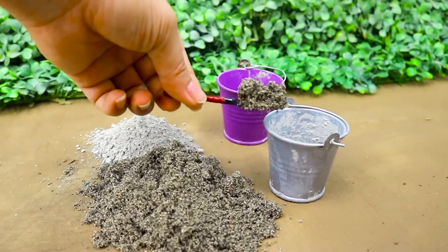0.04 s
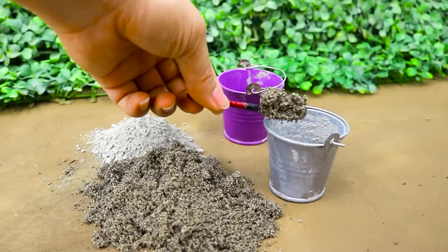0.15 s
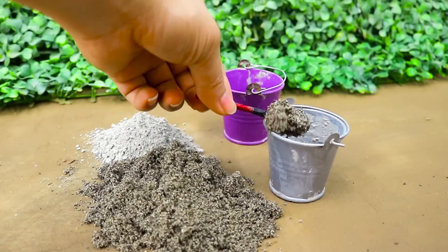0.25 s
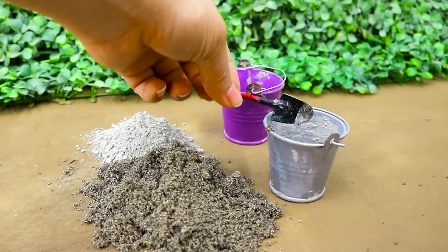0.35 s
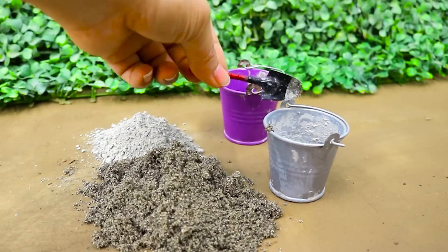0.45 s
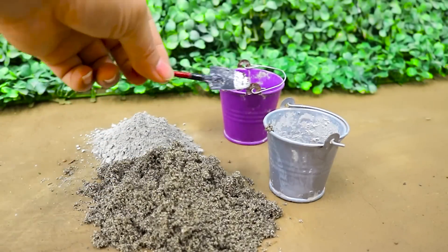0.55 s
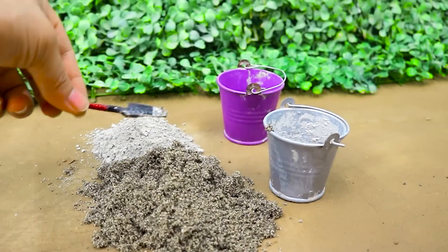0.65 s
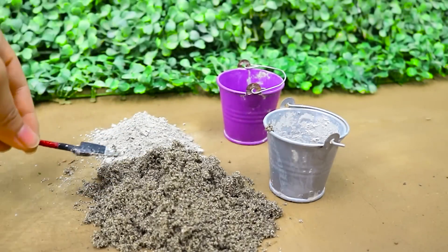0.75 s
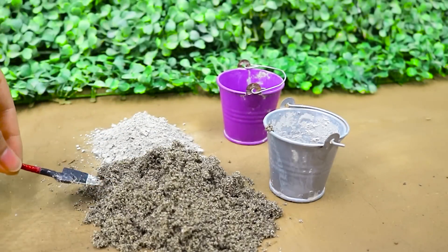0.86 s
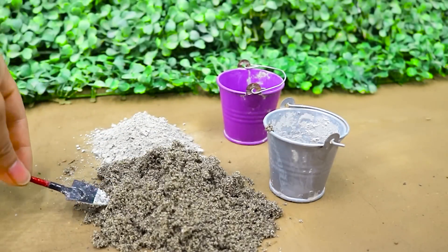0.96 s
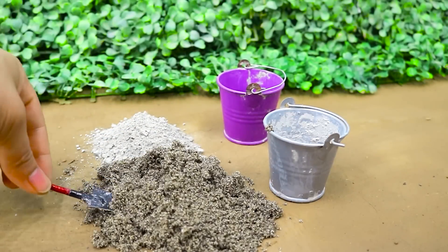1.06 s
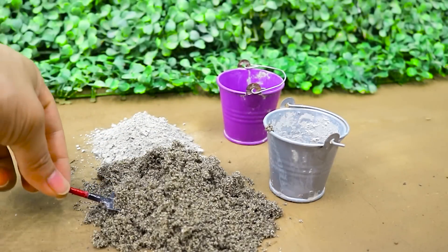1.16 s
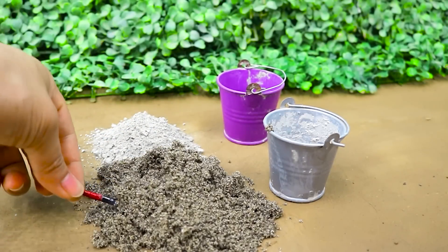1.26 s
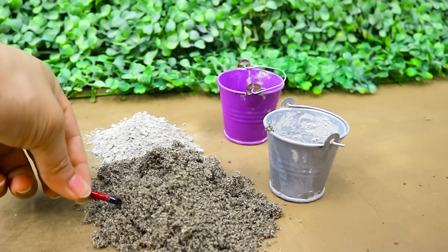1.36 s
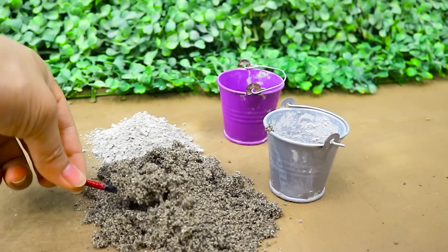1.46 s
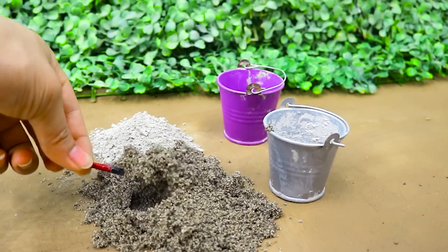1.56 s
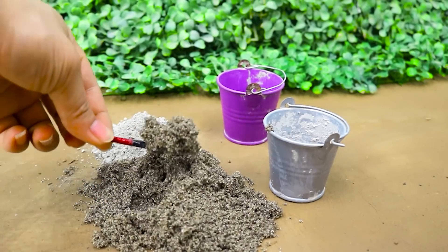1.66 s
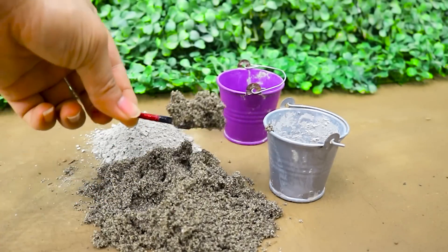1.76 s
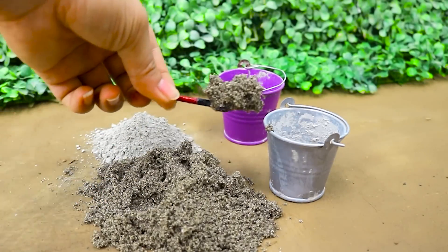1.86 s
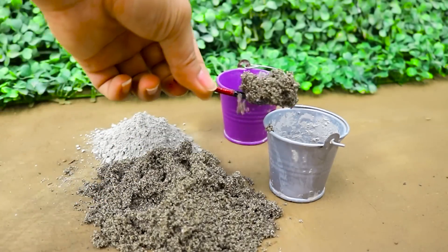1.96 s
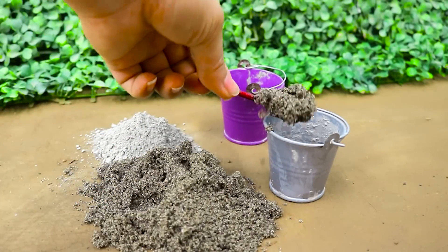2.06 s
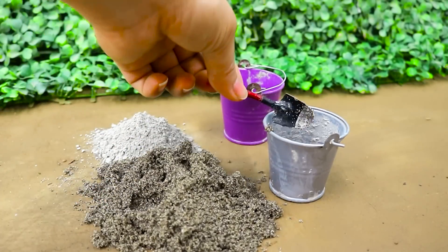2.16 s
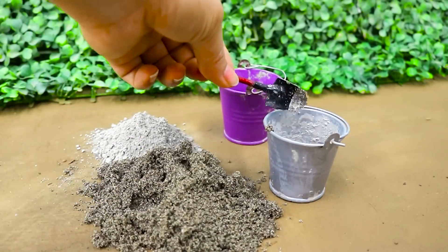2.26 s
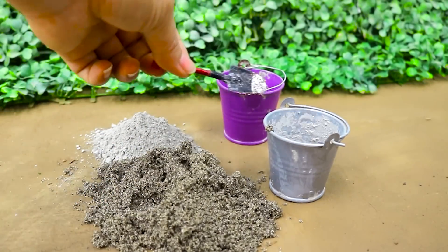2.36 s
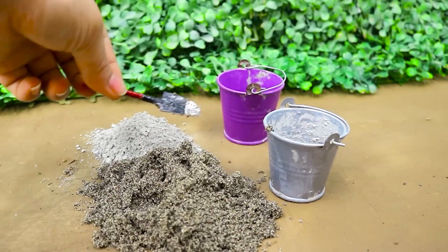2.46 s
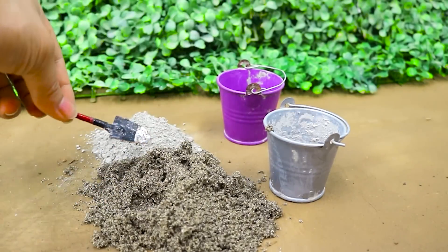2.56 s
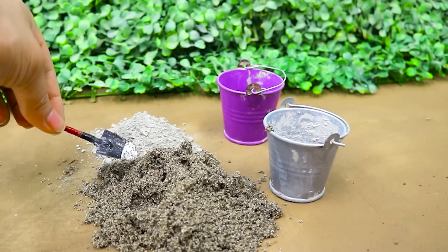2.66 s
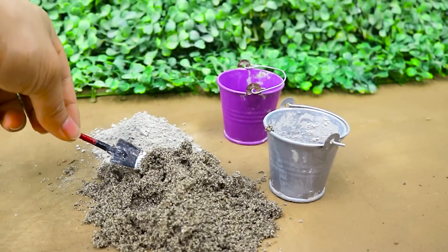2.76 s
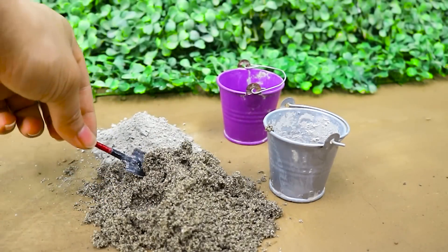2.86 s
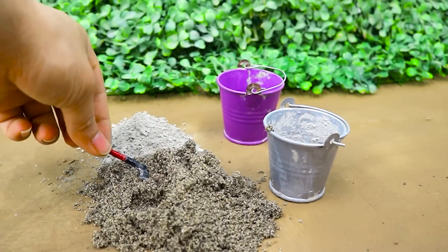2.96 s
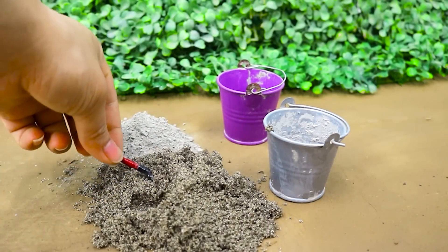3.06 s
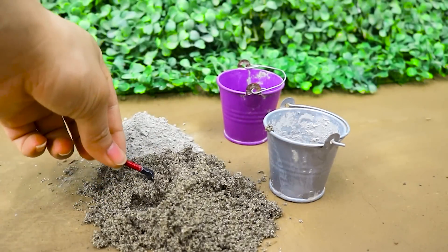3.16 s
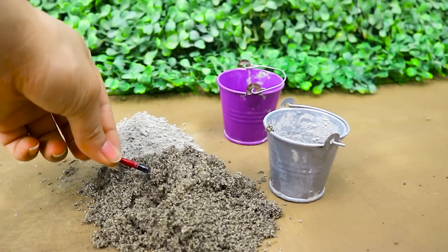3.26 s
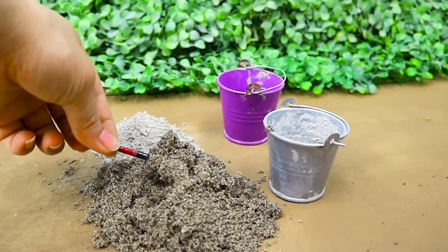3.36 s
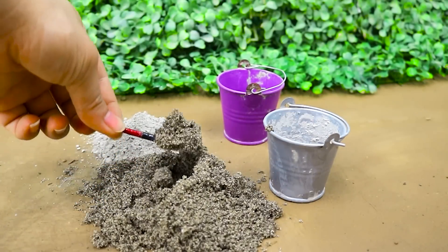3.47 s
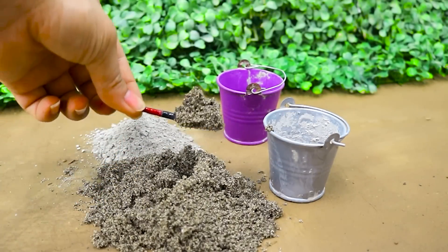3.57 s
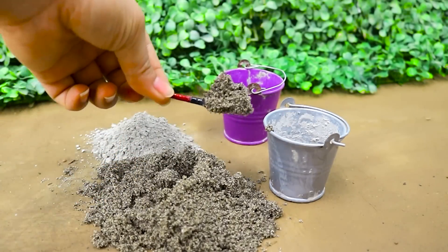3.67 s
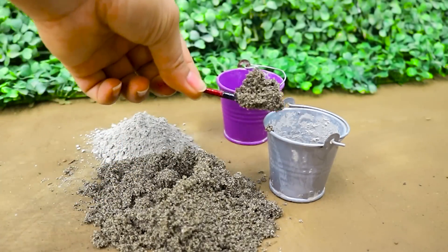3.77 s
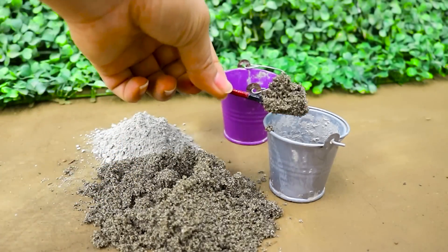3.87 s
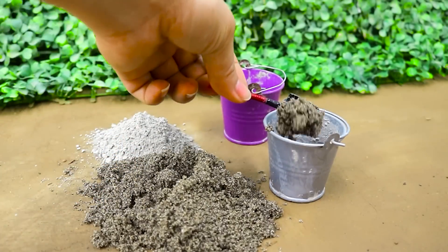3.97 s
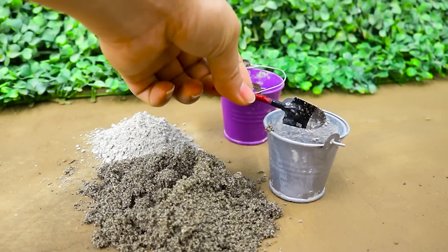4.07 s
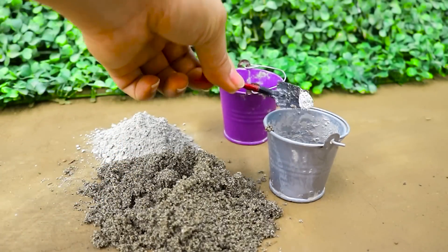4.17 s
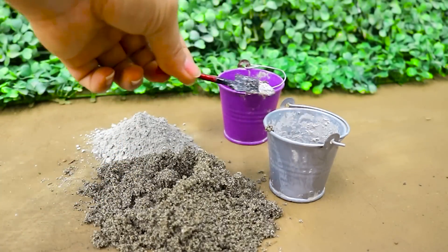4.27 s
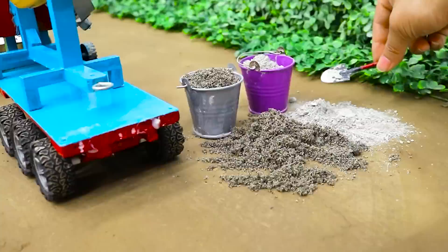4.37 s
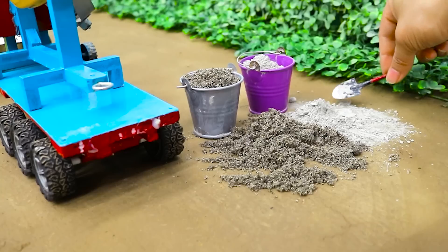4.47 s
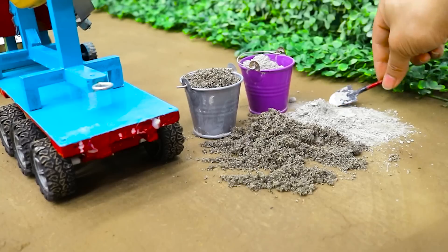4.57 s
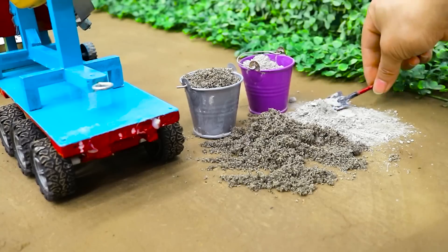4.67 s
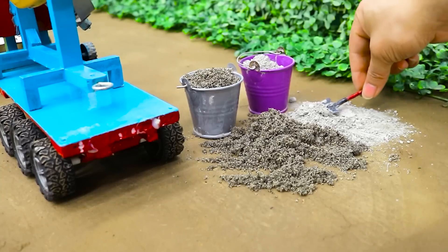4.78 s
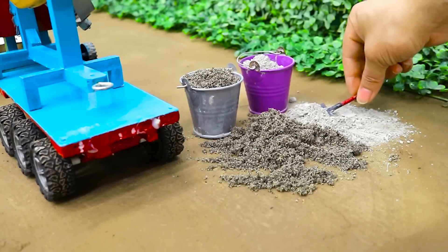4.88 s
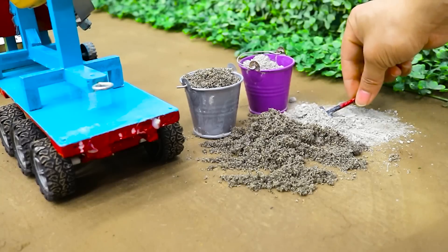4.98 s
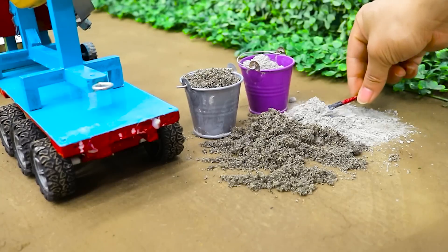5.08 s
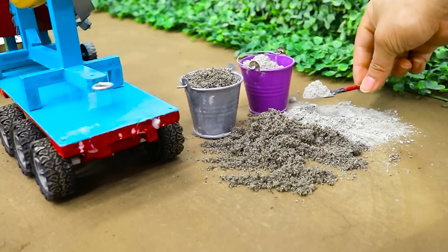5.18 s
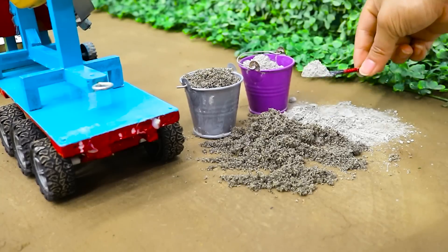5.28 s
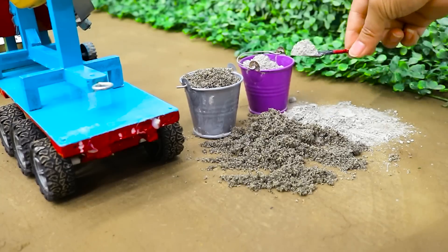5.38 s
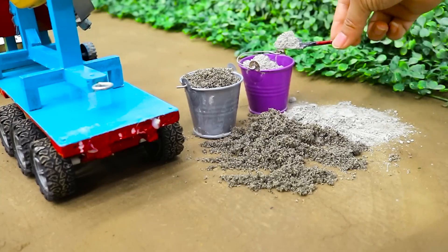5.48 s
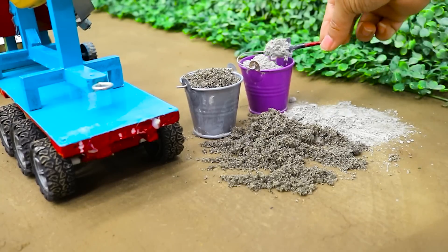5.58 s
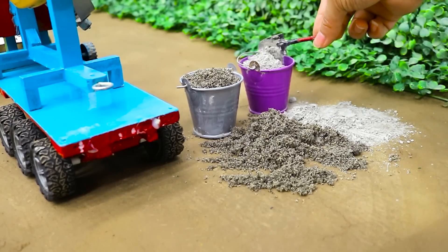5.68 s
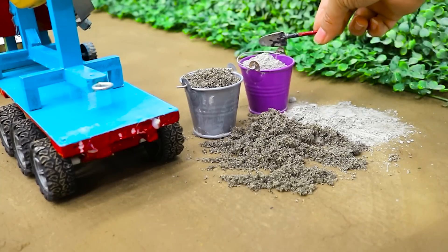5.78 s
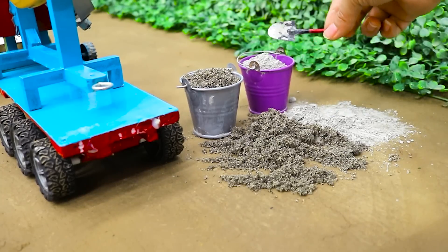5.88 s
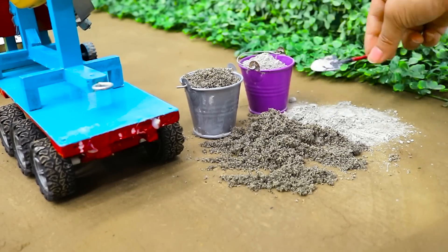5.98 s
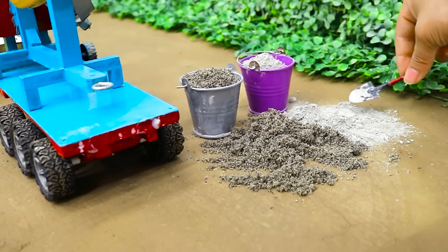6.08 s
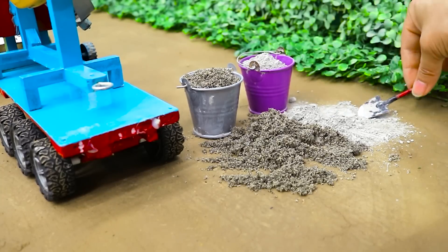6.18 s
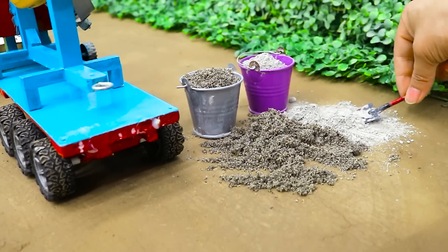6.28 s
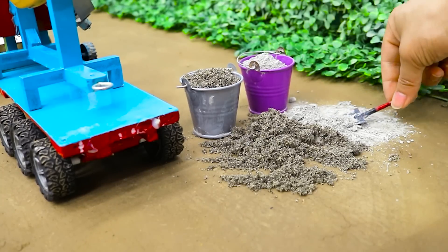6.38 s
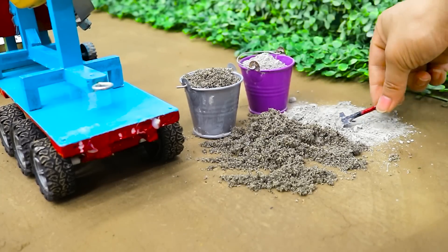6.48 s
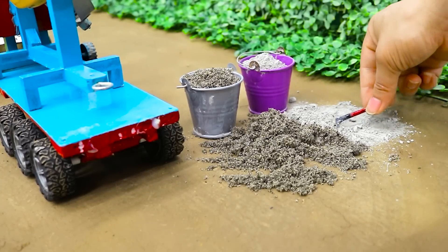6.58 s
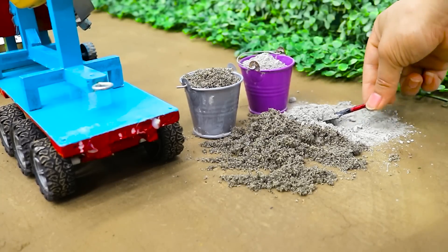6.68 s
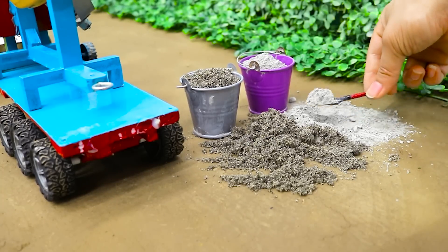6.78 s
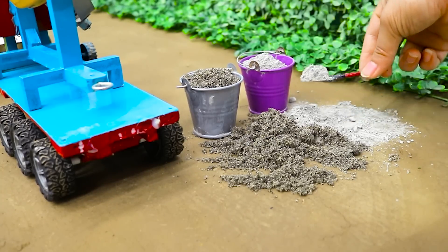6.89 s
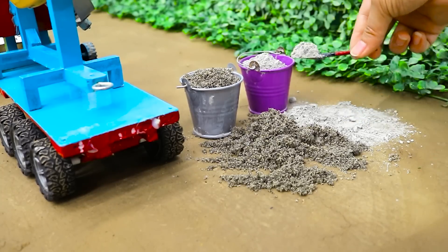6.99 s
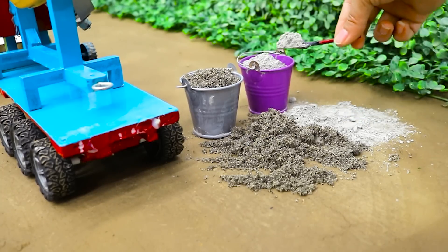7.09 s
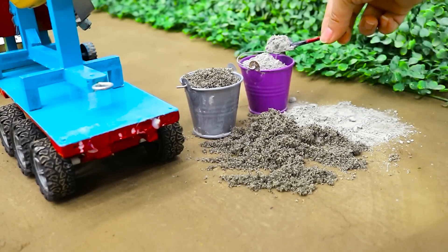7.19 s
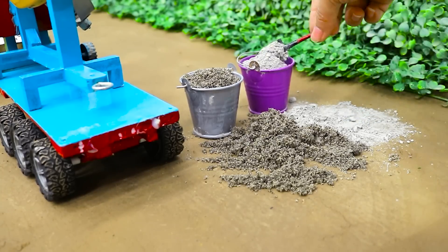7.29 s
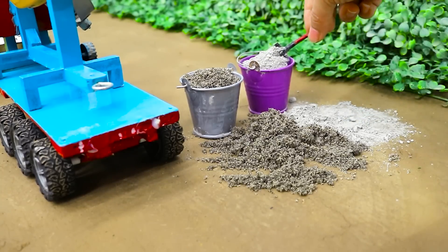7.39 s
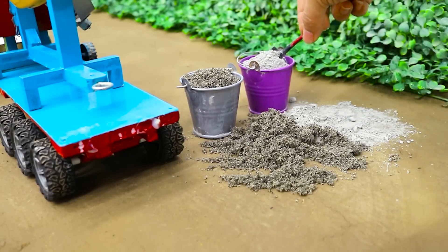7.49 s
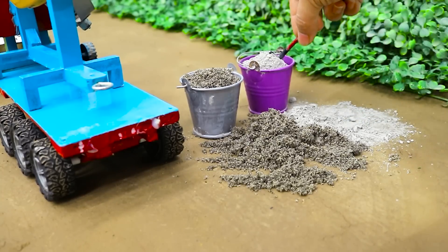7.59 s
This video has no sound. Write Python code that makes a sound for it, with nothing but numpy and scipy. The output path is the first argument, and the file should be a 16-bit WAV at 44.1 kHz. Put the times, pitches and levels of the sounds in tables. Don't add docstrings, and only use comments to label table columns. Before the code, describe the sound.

Close gritty scoops of sand alternate with brief rattling pours into a little metal pail, stray grains ticking over faint low outdoor rumble.

```python
import sys
import numpy as np
from scipy import signal
from scipy.fft import rfft, irfft, next_fast_len
from scipy.io import wavfile
from scipy.ndimage import uniform_filter1d

SR = 44100
rng = np.random.default_rng(int(sys.argv[2]) if len(sys.argv) > 2 else 0)


def gain_from_decibels(decibels):
    exponent = np.asarray(decibels, float) / 20
    return 10 ** exponent


def generate_wav(signal):
    frames = np.transpose(np.atleast_2d(signal))
    scaled = np.clip(frames, -1, 1) * 32767
    pcm = np.round(scaled).astype(np.int16)
    wavfile.write(sys.argv[1], SR, pcm)


N = 336924

DIG_SPAN = (.966, 2.083)
POUR_SPAN = (-.472, .884)
SCRAPE_SPAN = (7.33, 7.65)
# frequency in Hz, level in dB per Hz.
GRIT = [(180, -47), (300, -7.5), (527, -4.5), (643, -6.5), (896, -2.5), (2350, -11), (2630, -6),
        (4410, -11.5), (5200, -10), (11900, -7), (15800, -17.5)]
# frequency in Hz, level in dB, t60 in seconds.
BLADE = [(910, -10.5, 0.11), (2700, -6.5, 0.026), (4000, -7, .009), (5380, -14, 0.017), (6680, -10, 0.03),
         (9080, -3, 0.0075), (10200, -6.5, 0.01), (11860, 2.5, 0.011)]


def level(x, db=0):
    return x * gain_from_decibels(db) / np.sqrt(np.mean(x ** 2))


def clock(span):
    return span[0] + np.arange(int((span[1] - span[0]) * SR)) / SR


def pair(mid, side):
    return np.array([mid + side, mid - side])


def band(x, lo, hi, order=2):
    return signal.sosfilt(signal.butter(order, [lo, hi], "band", fs=SR, output="sos"), x)


def top_cut(x, hz):
    return signal.sosfilt(signal.ellip(10, .2, 80, hz, fs=SR, output="sos"), x)


def split(x, edges_hz, sharp=14):
    n = next_fast_len(x.shape[-1], True)
    spec = rfft(x, n)
    hz = np.arange(n // 2 + 1) * SR / n
    under = [0] + [1 / (1 + (hz / e) ** sharp) for e in edges_hz] + [1]
    return [irfft(spec * (b - a), n)[..., :x.shape[-1]] for a, b in zip(under, under[1:])]


def colour(x, table):
    n = next_fast_len(x.shape[-1] + 4096)
    n += n % 2
    hz, db = np.transpose(table)
    bins_hz = np.arange(n // 2 + 1) * SR / n
    log_gain = np.interp(np.log(bins_hz + 1), np.log(hz), db) * np.log(10) / 20
    cep = irfft(log_gain, n)
    cep[1:n // 2] *= 2
    cep[n // 2 + 1:] = 0
    return irfft(rfft(x, n) * np.exp(rfft(cep)), n)[..., :x.shape[-1]]


def clumps(n, size):
    noise = rng.standard_normal(n)
    return level(uniform_filter1d(uniform_filter1d(noise, size=size), size=size))


def swells(t, rows, bend):
    s, db, swell, ebb = (c[:, None] for c in np.transpose(rows)[:4])
    rise, fall = 1 + (t - s) / swell, 1 - (t - s) / ebb
    shape = np.clip(np.minimum(rise, fall), 0, 1) ** bend
    return (gain_from_decibels(db) * shape) ** 2 + 1e-18


def ring(x, modes):
    out = 0
    for hz, db, t60 in modes:
        r = np.exp(-np.log(1000) / (t60 * SR))
        w = 2 * np.pi * hz / SR
        feed, poles = [np.sin(w) * np.sqrt(2 - 2 * r * r)], [1, -2 * r * np.cos(w), r * r]
        out = out + gain_from_decibels(db) * signal.lfilter(feed, poles, x)
    return out


def air(n, tone, db, alike, right_db):
    a, b = rng.standard_normal((2, n))
    alike = np.clip(alike, 0, 1)
    ports = pair(np.sqrt(1 + alike) * a, np.sqrt(1 - alike) * b) * gain_from_decibels(np.array([[0], [right_db]]))
    return level(colour(ports, tone), db)


def ticks(span, rows, t60, width, rattle_db, gain_db):
    scatter = .09
    t = np.arange(2048) / SR
    out = np.zeros((2, len(clock(span)) + len(t)))
    for (s, db, hz), (aside, *noise) in zip(rows, rng.standard_normal((len(rows), len(t) + 1))):
        push = gain_from_decibels(rattle_db) * np.array(noise) ** 3 * gain_from_decibels(-60 * t / t60)
        push[0] = 1
        ping = band(push, hz / width, min(hz * width, 14500))
        i = int((s - span[0]) * SR)
        out[:, i:i + len(t)] += gain_from_decibels(db + gain_db) * pair(ping, scatter * aside * ping) / np.max(abs(ping))
    return out[:, :-len(t)]


def clinks(t):
    # start in seconds, peak in dB, mode in Hz, t60 in seconds.
    lumps = [(.33, -43, 2350, .1), (.335, -39, 2830, .1), (.36, -23, 2102, 0.2), (.375, -32.5, 1313, 0.12),
             (0.384, -28, 1711, 0.097), (0.404, -24.5, 2830, .08), (0.412, -26.5, 4080, 0.12),
             (0.458, -34, 2880, 0.067), (.462, -26.5, 3150, 0.05), (.43, -34.5, 2080, 0.12),
             (.25, -31.5, 2300, .05), (.413, -30.5, 7490, .07), (.415, -34, 3180, .07),
             (.44, -35.5, 4330, .07), (.47, -40, 1402, .12), (.5, -40, 3300, .06), (.497, -42, 1711, 0.21),
             (0.511, -36.5, 2840, 0.1), (0.513, -46, 1384, 0.24), (.52, -52, 655, 0.28),
             (.561, -39.5, 3132, 0.061), (.572, -45.5, 2102, 0.13)]
    out = 0
    for s, db, hz, t60 in lumps:
        age = np.maximum(t - s, 0)
        envelope = gain_from_decibels(db - 60 * age / t60) * (1 - np.exp(-age / 0.0043))
        out = out + envelope * np.sin(2 * np.pi * hz * age)
    return pair(out, .07 * out)


def grains(n, rate, spread_db, clump_db, patch_db=0):
    patch_hz = [900, 1600, 2500, 3600, 5000, 6500, 8200, 10000, 12000]
    hit, size = rng.random(n), rng.exponential(size=n)
    sign, bed = rng.standard_normal((2, n))
    coarse = level((hit < rate / SR) * sign * gain_from_decibels(spread_db * np.minimum(size, 3.4)))
    whole = (coarse + gain_from_decibels(0.2) * bed) * gain_from_decibels(clump_db * clumps(n, size=160))
    if patch_db:
        whole = sum(b * gain_from_decibels(patch_db * clumps(n, size=300)) for b in split(whole, patch_hz, sharp=20))
    return level(whole)


def sand(span, rows, mix, bend, tone, modes, rate, spread_db, clump_db, side_db, lag_db, patch_db):
    cross_hz = [1500, 5000, 10000]
    t = clock(span)
    mid = grains(len(t), rate, spread_db, clump_db, patch_db)
    wide = grains(len(t), rate, spread_db, clump_db)
    side = gain_from_decibels(side_db) * (level(np.gradient(wide)) + 1.2 * wide)
    side = side - gain_from_decibels(lag_db) * level(np.gradient(split(mid, [250, 750], sharp=4)[1]), -21.0)
    heap, metal, grit, fines = (level(b) for b in split(colour(pair(mid, side), tone), cross_hz))
    power = swells(t, rows, bend)
    flow = np.sqrt(power.sum(axis=0))
    depth = np.transpose(rows)[4] @ power / power.sum(axis=0)
    fines_db, metal_db, heap_db, ring_db = (a + (b - a) * depth for a, b in mix)
    direct = flow * (grit + gain_from_decibels(fines_db) * fines + gain_from_decibels(metal_db) * metal + gain_from_decibels(heap_db) * heap)
    return direct + ring(flow * gain_from_decibels(ring_db) * pair(mid, gain_from_decibels(side_db) * wide), modes)


def scrape():
    # peak in seconds, peak in dB, swell in seconds, ebb in seconds, depth 0-1.
    strokes = [
        (7.45, -34.5, 0.051, 0.078, .2),
        (7.495, -33.5, 0.066, 0.026, .2),
        (7.515, -38.5, 0.027, 0.032, .3),
        (7.575, -36.5, 0.051, 0.068, .7),
        (7.64, -31, 0.082, .05, 0.95),
    ]
    # level in dB at depth 0, level in dB at depth 1.
    balance = [(2.5, 0), (-2.5, 1.5), (-9.5, -3), (-37.5, -18)]
    # start in seconds, peak in dB, centre in Hz.
    knock = [
        (7.5144, -27, 5010),
        (7.5443, -25, 950),
        (7.5446, -13, 11500),
        (7.5447, -22, 8500),
    ]
    drag = sand(SCRAPE_SPAN, strokes, balance, 0.98, GRIT, BLADE, rate=6100, spread_db=-3.0,
                clump_db=1.2, side_db=-20.5, lag_db=-11.5, patch_db=-0.7)
    hard = ticks(SCRAPE_SPAN, knock, t60=.007, width=1.4, rattle_db=-11, gain_db=-1.0)
    return top_cut(drag + hard, hz=15800)


def dig():
    # peak in seconds, peak in dB, swell in seconds, ebb in seconds, depth 0-1.
    thrust = [
        (1.122, -40.5, 0.0077, .03, 0),
        (1.17, -26, .052, .075, 0.25),
        (1.229, -30.5, .003, 0.03, 0.21),
        (1.25, -34.5, .04, 0.049, 0.41),
        (1.293, -29.5, 0.053, 0.046, 0.89),
    ]
    heave = [
        (1.384, -39.5, 0.053, 0.042, 0.24),
        (1.441, -44, .09, 0.11, 0.47),
        (1.569, -33, .13, 0.08, 0.28),
        (1.638, -34, .03, 0.081, 0.29),
        (1.764, -42.5, 0.23, 0.059, 0.56),
        (1.82, -55.5, .06, 0.1, 0.91),
        (2.0, -59.5, 0.15, 0.2, 1),
    ]
    # level in dB at depth 0, level in dB at depth 1.
    thrust_mix = [(-3, 3.5), (-12, -5), (-22.5, -9), (-25.5, -6)]
    lift_mix = [(1, -1.5), (-9, 2), (-14, 1.5), (-12, -14)]
    # start in seconds, peak in dB, centre in Hz.
    crunch = [(1.1347, -14, 9020), (1.1648, -11, 12300), (1.1698, -11, 9410), (1.226, -10, 12000),
              (1.2308, -12, 10500), (1.2348, -14, 10500), (1.2454, -16, 8820), (1.2618, -14, 11600),
              (1.2769, -10, 11700), (1.2828, -8, 12300), (1.2918, -12, 11800), (1.3228, -17, 12500),
              (1.3662, -20, 11500), (1.3858, -20, 8480), (1.4176, -24, 12200), (1.5109, -17, 9960),
              (1.6276, -16, 8780), (1.6308, -18, 9940), (1.6618, -20, 8650), (1.734, -24, 8560),
              (1.7618, -24, 9860), (1.7718, -22, 11800)]
    strays = [
        (1.9199, -51, 13100),
        (2.0152, -52, 13100),
        (2.0362, -48, 13000),
        (2.0498, -50, 12900),
        (2.0711, -60, 12800),
    ]
    # frequency in Hz, level in dB per Hz.
    still = [(8.8, -26), (15, 6.5), (28, -12), (49, -17), (95, -5), (110, -8.5), (131, -10), (393, -26.5),
             (1020, -39), (1570, -48.5), (15000, -65)]
    cut = sand(DIG_SPAN, thrust, thrust_mix, 0.89, GRIT, BLADE, rate=6000, spread_db=-0.5,
               clump_db=1.05, side_db=-27, lag_db=-1.5, patch_db=2.0)
    lift = sand(DIG_SPAN, heave, lift_mix, 1.034, GRIT, BLADE, rate=6000, spread_db=3.0,
                clump_db=0.3, side_db=-26.5, lag_db=-6.5, patch_db=1.8)
    hard = ticks(DIG_SPAN, crunch, t60=.008, width=1.5, rattle_db=-19, gain_db=-1.5)
    crumbs = ticks(DIG_SPAN, strays, t60=.006, width=1.1, rattle_db=-22.5, gain_db=-6)
    rest = air(hard.shape[1], still, -51.5, alike=0.49, right_db=0.0)
    return top_cut(cut + lift + hard + crumbs + rest, hz=15600)


def pour():
    # peak in seconds, peak in dB, swell in seconds, ebb in seconds, depth 0-1.
    falls = [
        (.208, -47.5, .006, 0.059, 0),
        (.233, -38.5, 0.0049, 0.077, 0.07),
        (.344, -26.5, 0.12, 0.085, 0.54),
        (.385, -27, 0.036, 0.038, 0.67),
        (.415, -27.5, 0.027, 0.079, 0.97),
        (.47, -38.5, 0.058, 0.11, 0.79),
        (.559, -47.5, 0.0034, 0.084, 1),
    ]
    # level in dB at depth 0, level in dB at depth 1.
    balance = [(-3, -11.5), (0, -6.5), (1.5, -24.5), (-3.5, -18.5)]
    # peak in seconds, peak in dB, swell in seconds, ebb in seconds.
    trickle = [
        (.01, -58.5, .3, 0.24),
        (.2, -51.5, 0.12, .45),
        (.645, -53, 0.022, .09),
        (.76, -53, 0.11, 0.041),
        (.828, -55, .008, 0.052),
    ]
    # start in seconds, peak in dB, centre in Hz.
    early = [(0.0138, -33, 5540), (0.0228, -36, 5590), (0.0537, -35, 7300), (0.0921, -38, 4810),
             (0.149, -42, 6860), (0.1749, -40, 7250), (0.1899, -37, 5700), (0.2028, -23, 6720),
             (0.2303, -22, 4570), (0.3398, -9, 4940), (0.3878, -11, 7320), (0.4119, -12, 7490),
             (0.4688, -22, 6380), (0.559, -24, 8000), (0.595, -30, 5480)]
    strays = [(0.6158, -30, 8890), (0.624, -24, 9110), (0.6443, -37, 9190), (0.6808, -40, 9110),
              (0.6958, -44, 9120), (0.7063, -39, 8840), (0.7271, -27, 8720), (0.7358, -35, 8650),
              (0.7548, -35, 9420), (0.7606, -33, 8540), (0.7825, -40, 10200), (0.796, -39, 9680),
              (0.8008, -33, 9510), (0.8259, -22, 9530), (0.8318, -26, 9100), (0.8358, -29, 8870),
              (0.8588, -41, 9660)]
    # frequency in Hz, level in dB, t60 in seconds.
    tin = [(655, -25, 0.12), (1370, -25, 0.83), (1711, -11.5, 0.12), (2102, -8, 0.035), (2387, -10, 0.0417),
           (2830, -11, 0.24), (3132, -3, 0.043), (4080, -7, 0.13), (5170, -5.5, 0.016),
           (6020, -3.5, 0.0072), (6520, -9.5, 0.026), (6560, -5.5, .04), (7240, -18.5, 0.028),
           (9500, -11.5, 0.014)]
    rim = [(8300, -16, 0.019), (9000, -11, 0.021), (9700, -12, .014)]
    # frequency in Hz, level in dB per Hz.
    fall_tone = [(180, -44.5), (300, -4.5), (529, -6), (1040, -10.5), (1340, -4.5), (1870, -12), (2090, 2),
                 (2600, -4.5), (9190, -1.5), (13000, -18.5)]
    wind_tone = [(8.8, -39), (15, 5), (70, -1.5), (166, -8), (267, -17.5), (385, -37), (438, -17.5),
                 (480, -28.5), (1200, -47.5), (1560, -84.5), (2640, -120)]
    dust_tone = [(150, -30.5), (250, -5.5), (1010, -18), (1930, -20), (3180, -23), (3520, -27.5),
                 (6290, -22.5), (9540, -23), (11500, -27.5), (13300, -45.5)]
    t = clock(POUR_SPAN)
    stream = sand(POUR_SPAN, falls, balance, 1.165, fall_tone, tin, rate=4400, spread_db=2.0,
                  clump_db=-1.35, side_db=-23.5, lag_db=-2, patch_db=1.5)
    thin = band(grains(len(t), rate=2500, spread_db=2, clump_db=2), 5000, 12000)
    gust_db = 1.5 * clumps(len(t), size=2500)
    wind = air(len(t), wind_tone, -39.5, alike=0.41, right_db=3) * gain_from_decibels(gust_db)
    hard = ticks(POUR_SPAN, early, t60=.011, width=2.1, rattle_db=-13, gain_db=0)
    hard = hard + gain_from_decibels(-14) * ring(hard, tin)
    late = ticks(POUR_SPAN, strays, t60=.014, width=1.28, rattle_db=-22, gain_db=-1)
    hard = hard + late + ring(late, rim)
    hard = band(hard, 1900, 11500, order=1)
    quiet = level(thin) * np.sqrt(swells(t, trickle, bend=1.2).sum(axis=0))
    quiet = quiet + wind + air(len(t), dust_tone, -54, alike=0.84, right_db=-1.3)
    return top_cut(stream + hard + clinks(t), hz=12750) + top_cut(quiet, hz=13350)


def add(out, part, start):
    cut_s = .003
    i = int(round(start * SR))
    lo, hi = max(i, 0), min(i + part.shape[1], N)
    part = part * np.minimum(np.arange(part.shape[1])[::-1] / (cut_s * SR), 1)
    out[:, lo:hi] += part[:, lo - i:hi - i]


def scene():
    dig_shifts = [-2.0483, 0, 1.7674, 3.7000, 5.3188]
    pour_shifts = [0, 1.9161, 3.7001, 5.4675, 6.9541]
    out = np.zeros((2, N))
    parts = [(dig(), DIG_SPAN, dig_shifts), (pour(), POUR_SPAN, pour_shifts), (scrape(), SCRAPE_SPAN, [0])]
    for part, span, shifts in parts:
        for shift in shifts:
            add(out, part, span[0] + shift)
    return out


def roll_off(x):
    return signal.sosfilt(signal.butter(12, 16460, fs=SR, output="sos"), x)


def record(dry):
    def power(x):
        return uniform_filter1d(np.sum(x ** 2, axis=0), size=1024)

    bass, body, top = split(dry, [3000, 13600], sharp=60)
    shut = power(top) < power(body) * gain_from_decibels(2 * -30)
    mix = dry - top * uniform_filter1d(1. * shut, size=256)
    return roll_off(mix)


dry = scene()
out = record(dry)
generate_wav(out)
```